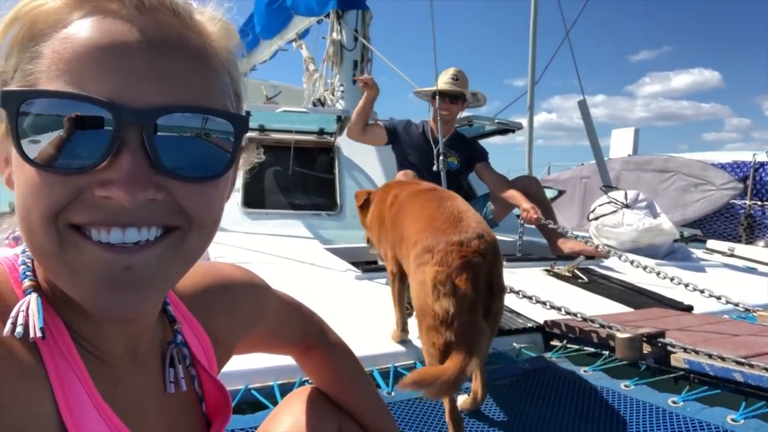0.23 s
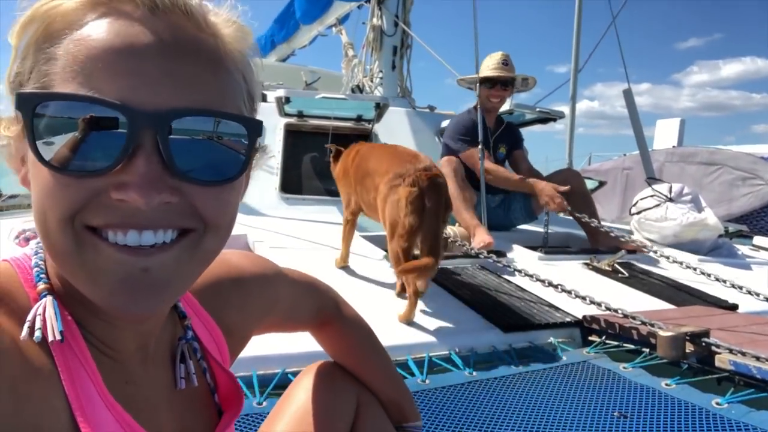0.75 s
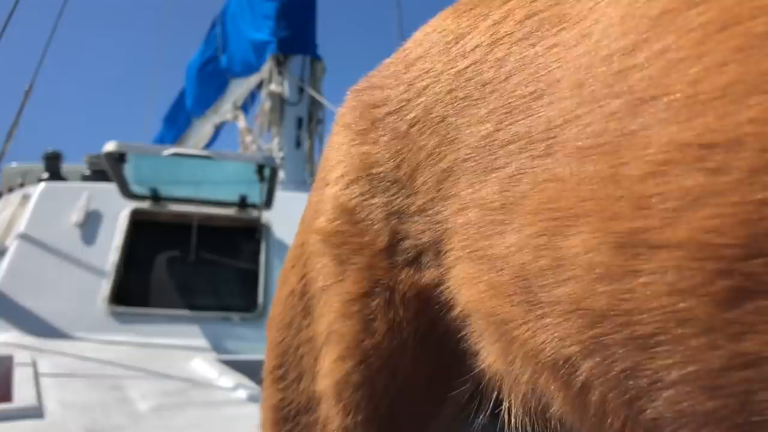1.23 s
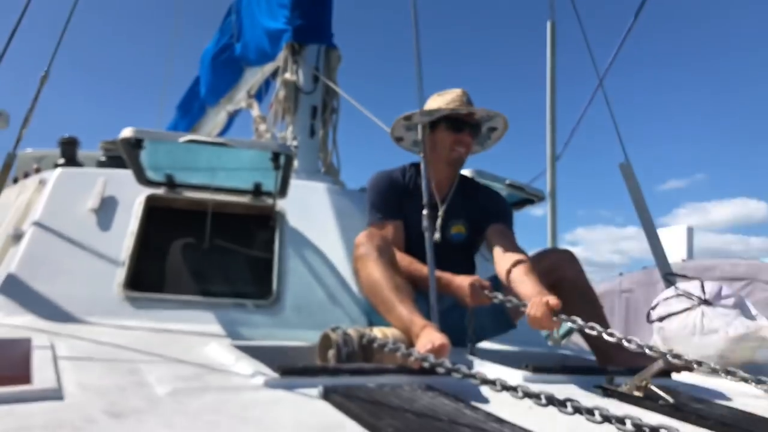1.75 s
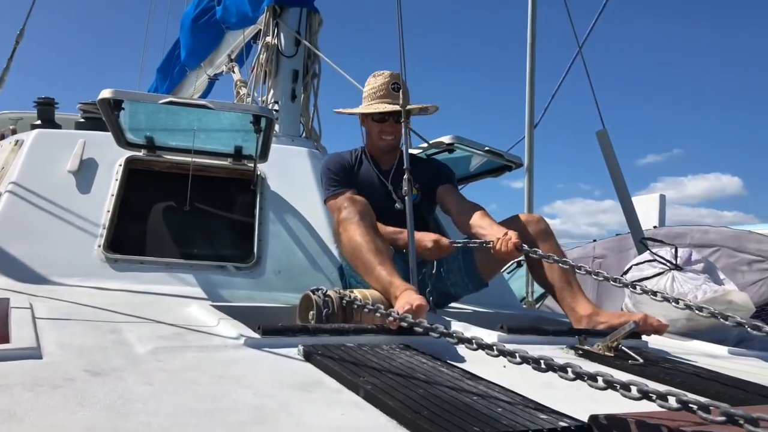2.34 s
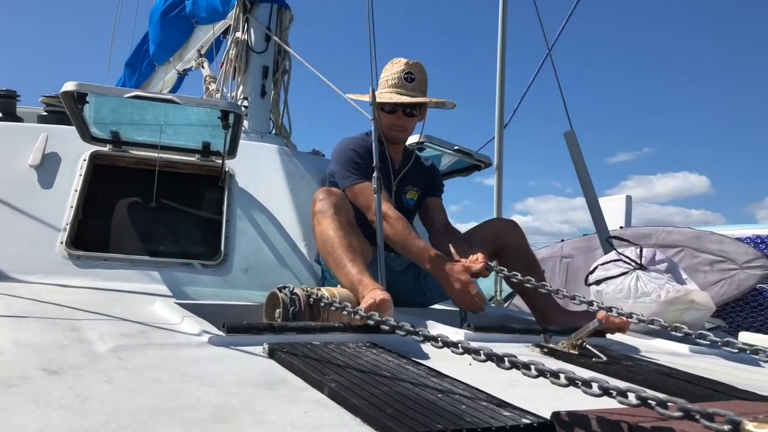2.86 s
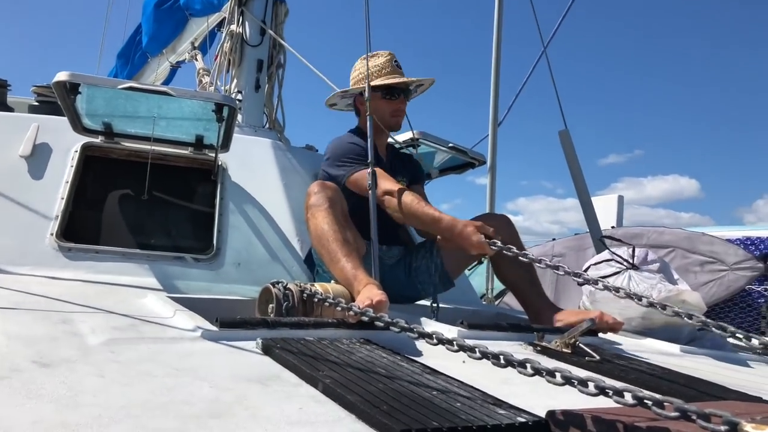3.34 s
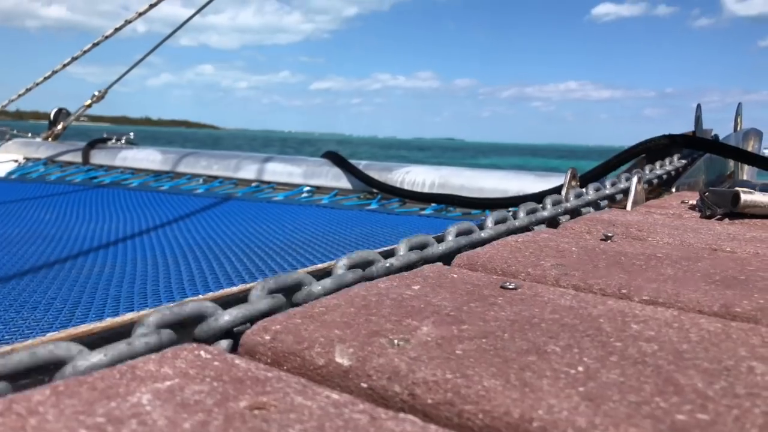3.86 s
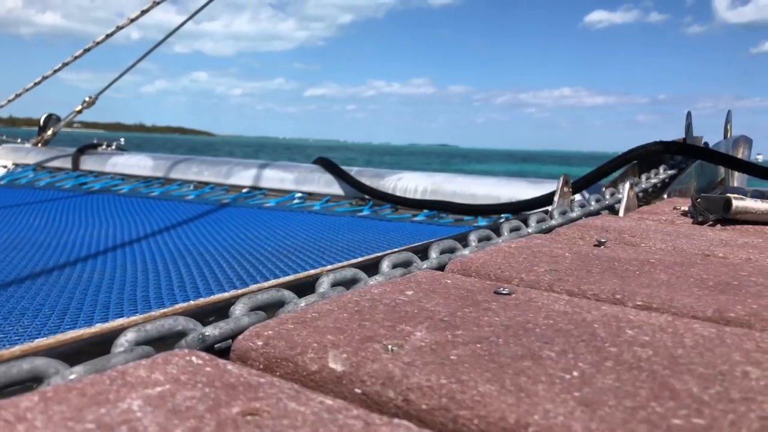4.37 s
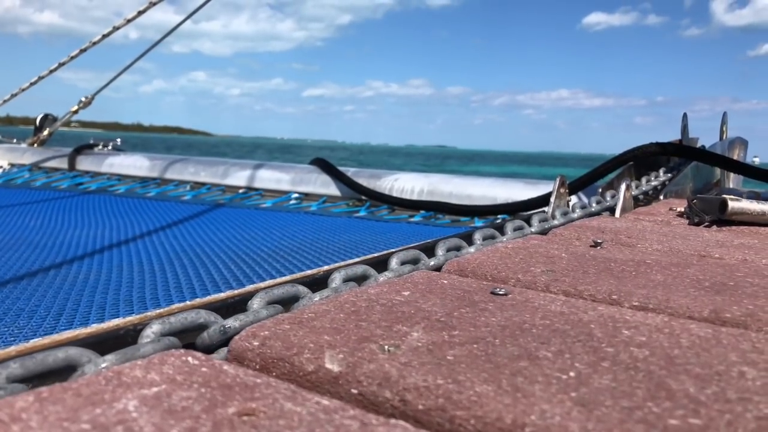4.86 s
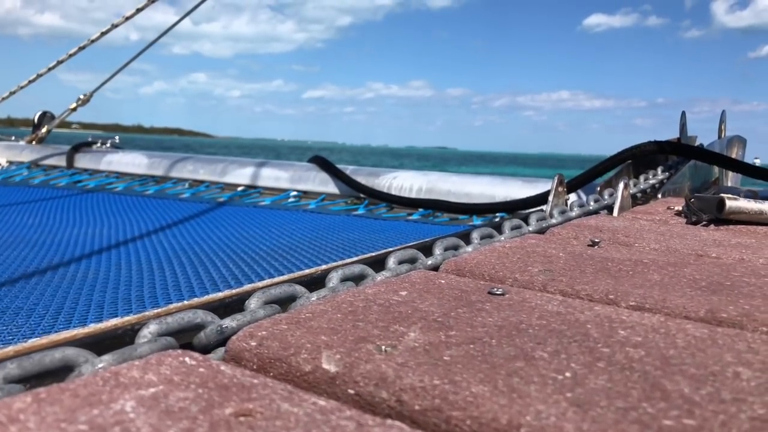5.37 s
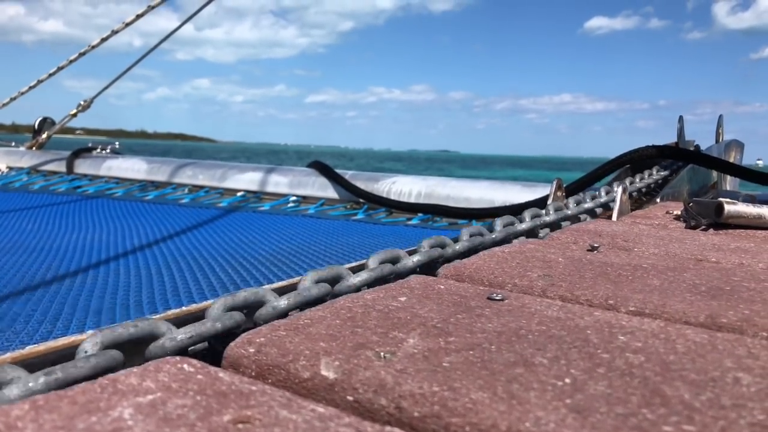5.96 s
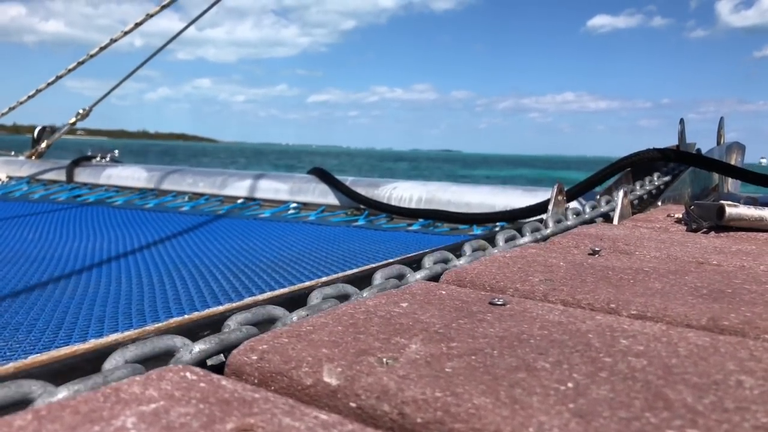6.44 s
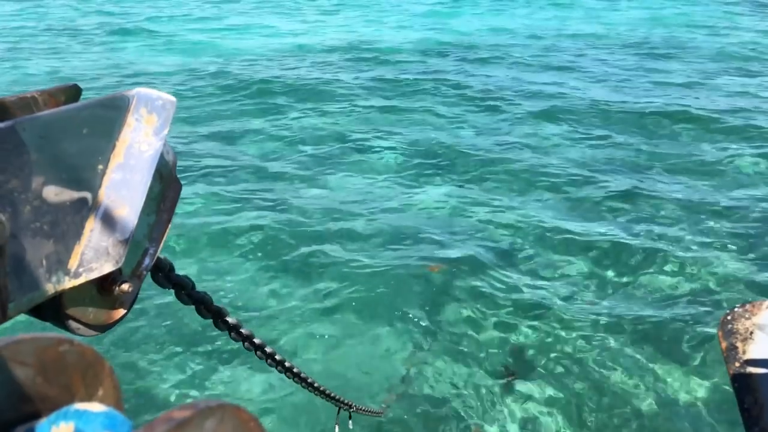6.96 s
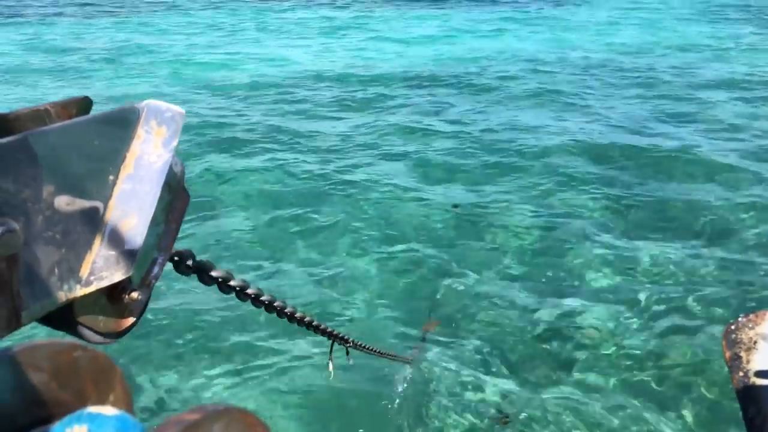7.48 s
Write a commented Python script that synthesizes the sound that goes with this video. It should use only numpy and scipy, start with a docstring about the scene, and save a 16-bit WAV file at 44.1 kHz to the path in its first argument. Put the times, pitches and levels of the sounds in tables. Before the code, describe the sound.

Anchor chain pulled by hand, heard from four successive positions with abrupt changes. Quiet footfalls, scuffs and ticks come first; then small tugs with thin jingling and a short clatter. Next, close loud links hammer wood over gritty dragging, stop, and start again. Last, hard ringing metal over a steel roller with a faint hum. Soft sea and breeze throughout, dry open air, close microphone.

```python
"""An anchor chain is hauled by hand over a boat's foredeck planks, heard from four places in turn.
First paws and feet thud on the hull amid scuffs, ticks and small pulls; from 1.29 s links clink, tap and jingle.
From 3.53 s long pulls grind while links knock hard on the planks; from 6.7 s bright clinks ring a steel roller.
Drag is grit noise, blows are decaying modes and noise bursts; sea and wind (noise bands) and hiss run throughout."""
import sys
import numpy as np
from scipy import signal
from scipy.fft import rfft, irfft
from scipy.io import wavfile

SR = 44100
rng = np.random.default_rng(int(sys.argv[2]) if len(sys.argv) > 2 else 0)


def to_wav(s):
    """Save 16-bit WAV."""
    ch = np.atleast_2d(s).T  # columns
    pcm = np.round(np.clip(ch, -1, 1) * 32767)  # PCM
    wavfile.write(sys.argv[1], SR, pcm.astype(np.int16))


def rack_gain(trim_db):
    """Turn a fader trim in dB into the linear factor to multiply a signal by."""
    fader = np.asarray(trim_db, float)
    return 10 ** (fader / 20)


N = 340011
T = np.arange(N) / SR

# pulls on the chain: fastest_s, speed_up_s, slow_down_s, grind_db, rasp_db
PULLS = [(.69, 0.081, 0.22, -54, -57.5), (1.33, 0.23, 0.22, -43, -55.5), (2.36, 0.41, 0.38, -40, -44),
         (3.452, 0.16, 0.2, -42.5, -46), (3.8, 0.52, 0.61, -29, -33.5), (4.77, 0.093, 0.18, -44, -88),
         (5.05, 1, 0.33, -64.5, -70.5), (5.978, 0.48, 0.56, -26.5, -32), (7.383, 0.29, 0.55, -35, -32)]
# links dropping on wood: start_s, level_db, pitch_hz
KNOCKS = [(1.386, -23.5, 703), (2.306, -7.5, 1490), (2.31, -11, 1050), (2.446, -33, 921), (2.524, -21, 915),
          (2.567, -18, 880), (2.597, -13.5, 900), (2.642, -25.5, 1160), (3.546, -17.5, 2340),
          (3.57, -18, 1020), (3.59, -10.5, 1250), (3.667, -4.5, 1890), (3.762, -4.5, 1610), (3.82, -9, 867),
          (3.837, 2, 1500), (3.842, -17.5, 783), (3.907, -3, 1666), (3.922, -10, 1330), (4.006, 1, 1710),
          (4.081, -13.5, 1080), (4.103, 0.5, 1680), (4.196, -2.5, 1380), (4.121, -16, 1080),
          (4.215, -15.5, 1390), (4.286, -16.5, 2340), (4.387, -3.5, 1340), (4.444, -17.5, 1970),
          (4.584, -28.5, 990), (4.691, -33, 1170), (4.955, -18.5, 1360), (5.078, -40, 1400),
          (5.159, -38, 1375), (5.24, -32.5, 1470), (5.629, -23, 824), (5.65, -12, 1620),
          (5.726, -11.5, 1220), (5.757, -2, 1310), (5.86, -20, 1510), (5.861, -3, 1750), (5.932, 1, 1630),
          (5.999, 0.5, 1600), (6.018, -0.5, 1610), (6.082, -7.5, 980), (6.094, -3, 1480), (6.14, -16, 732),
          (6.181, 1.5, 2010), (6.23, -20.5, 800), (6.26, -0.5, 1580), (6.274, -14.5, 1500),
          (6.3781, -2.5, 1360), (6.386, 0.5, 1600), (6.577, -21.5, 1020), (6.639, -6.5, 1394),
          (7.223, -37, 2440), (7.251, -25, 885), (7.35, -12, 1970), (7.633, -21.5, 657)]
# links striking steel: start_s, level_db, brightness_db
CLINKS = [(0.706, -34, -13), (1.2188, -25, -8), (1.3028, -29, -29), (2.044, -33, -42), (2.159, -30, -15),
          (2.243, -20, -17), (2.312, -21.5, -8.5), (2.373, -19.5, -17), (2.4346, -36, -26),
          (2.445, -20.5, -17), (2.537, -24, -14), (3.3968, -26, -21), (3.473, -24, -34.5),
          (3.5658, -8, -10), (3.595, -12.5, -40.5), (3.654, -6.5, -7), (3.7317, -6.5, -16.5),
          (3.7536, -14.5, -31), (3.8049, -8, -22), (3.813, -5.5, -15), (3.8965, -5.5, -10.5),
          (3.9904, -10, -10), (4.0809, -5.5, -24.5), (5.557, -41, -36), (5.598, -33, -17),
          (5.6409, -19, -16), (5.739, -15.5, -20), (5.7529, -9, -10.5), (5.834, -19.5, -11),
          (5.913, -8.5, -12), (5.9923, -10, -9.5), (6.0708, -12.5, -17.5), (6.1564, -5, -12),
          (6.182, -17.5, -44.5), (6.259, -24.5, -20), (6.32, -21.5, -20), (6.414, -16.5, -32),
          (6.639, -15.5, -30), (7.1595, -12, -13), (7.2782, -6.5, -12), (7.355, -2, -1.5),
          (7.363, -18.5, -37), (7.424, -13, -14.5), (7.44, -7.5, -3), (7.5194, -3, -8.5),
          (7.5903, -20.5, -42.5), (7.6038, -7, -5), (7.652, -15.5, -16), (7.6985, -7.5, -13.5)]
# paws, feet and chain on the hollow hull: start_s, level_db, pitch_hz
THUDS = [(0.087, -30, 144), (0.275, -36, 150), (0.294, -35, 382), (0.361, -41, 196), (0.426, -32, 327),
         (0.53, -37, 410), (0.569, -33.5, 584), (0.94, -42, 286), (3.773, -21, 150), (0.303, -31, 119),
         (0.435, -26.5, 454), (0.451, -32, 245), (0.564, -35, 250), (0.653, -38.5, 284),
         (1.386, -20.5, 272), (2.522, -26.5, 338), (2.595, -22, 276), (4.373, -41, 310)]
# scuffs and short ticks on the deck: start_s, level_db, brightness_db, length_s (held to 0.004 or more)
SCUFFS = [(.0, -40.5, -5, 0.031), (0.056, -42, 5, .04), (0.147, -39.5, -2.5, 0.052),
          (0.333, -40, -8, 0.088), (0.449, -42, -3, 0.01), (0.554, -48, -22, 0.021),
          (0.61, -34, -10, 0.086), (0.863, -36, -18, 0.049), (0.918, -40.5, -4, 0.02),
          (0.99, -49, 0, 0.0071), (1.153, -42.5, -8, 0.008), (1.035, -39, -14, 0.0094),
          (2.131, -31, 1, 0.0063), (1.072, -41, -16, 0.063), (1.489, -39.5, -34, 0.063),
          (1.584, -32.5, 2, 0.014), (1.607, -34, -13, 0.011), (1.623, -35.5, 1, 0.017),
          (4.34, -36, -11, 0.0036), (1.301, -39, -24, 0.069), (1.963, -38.5, -13, 0.071),
          (2.71, -43.5, 4, 0.031), (2.976, -40, 7, 0.0031), (3.03, -37, -4, 0.0035),
          (3.04, -41.5, -8, 0.019), (3.059, -35, -4, 0.017), (4.376, -29, -35, 0.0034),
          (4.966, -46.5, 4, 0.042), (5.232, -50, 1, 0.013), (6.751, -45, -22, 0.062),
          (6.929, -40.5, -8, 0.049)]
# link dragging a little, deck singing: start_s, level_db, pitch_hz, length_s
SCRAPES = [(1.485, -39, 2160, 0.045), (3.236, -46, 1850, 0.056), (4.75, -32.5, 1430, 0.055),
           (4.872, -39, 1300, 0.07), (5.23, -39.5, 1520, 0.035)]
# slack links tapping each other: start_s, level_db
JINGLE = [(1.3633, -30), (1.41, -32), (1.483, -40), (1.604, -32), (1.6797, -32.5), (2.096, -34.5),
          (2.533, -39), (2.594, -31), (2.613, -43), (2.631, -28.5), (4.7385, -48), (4.8267, -46),
          (4.889, -49), (4.9566, -53), (5.2365, -58)]
# pile settling, faint taps at random: from_s, to_s, taps (rounded down), level_db
SETTLING = [(2.11, 2.705, 9, -46), (4.76, 5.316, 6.6, -46.5)]

# plank modes under a link: pitch_hz, longest_t60_s
PLANK_MODES = [(740, 0.024), (920, 0.023), (1150, 0.02), (1400, 0.015), (1760, 0.02), (2250, 0.018),
               (3260, 0.036), (4300, 0.015)]
# steel bow roller modes: pitch_hz, width_hz, level_db
ROLLER_MODES = [(690, 66, -5), (915, 61, -1.5), (1020, 58, -4.5), (1970, 41, 2), (2190, 230, -5.5),
                (2740, 59, -8), (3480, 59, 4.5), (3590, 100, 6.5), (4080, 94, -15.5), (4190, 120, -12),
                (5830, 110, -16.5)]
# hollow hull modes: pitch_hz, width_hz, level_db
HULL_MODES = [(71, 26, -11), (130, 67, 0.5), (226, 24, -2), (310, 99, -8)]
# hum tones: pitch_hz, width_hz, level_db
HUM_MODES = [(194, 14, 0), (368, 63, -2.5), (429, 2.3, 7), (525, 4.3, -1)]
# bending rings of a loaded link: pitch_hz
LINK_BEND_HZ = [3280, 4054, 4496, 5107, 6366, 6930, 7360, 8320, 9950, 11330]
# lengthwise rings of a free link: pitch_hz
LINK_LENGTH_HZ = [15540, 15640, 15740]

# coarse drag spectrum: pitch_hz, level_db (per Hz)
GRIND_SPECTRUM = [(180, -48), (300, -6.5), (420, -6.5), (530, 2), (1040, -3), (1730, -2), (3000, -16),
                  (3900, -18.5), (6600, -120)]
# fine drag spectrum: pitch_hz, level_db (per Hz)
RASP_SPECTRUM = [(1800, -4.5), (3000, 2.5), (5000, -1.5), (8000, -11), (11000, -56.5)]
# top treble of the drag: pitch_hz, level_db (per Hz)
FIZZ_SPECTRUM = [(6000, -48.5), (9000, 10), (14000, -2.5), (15700, -4), (16000, -53)]
# noise of a link on wood: pitch_hz, level_db (per Hz)
CRACK_SPECTRUM = [(500, -2.5), (1500, -0.5), (4500, -7), (8000, -37.5), (16000, -57)]
# clink on steel: pitch_hz, level_db (per Hz)
STEEL_SPECTRUM = [(1400, -8.5), (2600, -1), (3500, -3.5), (6000, -1.5), (9000, 4), (15600, -17),
                  (16000, -35)]
# scuffs, deck ticks and jingle ticks: pitch_hz, level_db (per Hz)
SCUFF_SPECTRUM = [(500, 2.5), (1500, 4), (4000, 1), (6000, -1.5), (15600, -9.5), (16000, -41)]
# sea and wind: pitch_hz, level_db (per Hz)
WASH_SPECTRUM = [(20, -20.5), (40, -5.5), (65, 2), (130, -4), (220, 0.5), (400, -8.5), (700, -21.5),
                 (2000, -44), (6000, -45), (15500, -102), (16000, -68.5)]
# microphone hiss: pitch_hz, level_db (per Hz)
HISS_SPECTRUM = [(1000, 2), (15600, -21), (16000, -33.5)]

# four listening places in turn: from_s
PLACE_FROM_S = [0, 1.29, 3.53, 6.698]
# chain stirring between pulls, coarse part: level_db at each place
CREEP_GRIND_DB = [-57.5, -60, -59.5, -66]
# chain stirring between pulls, fine part: level_db at each place
CREEP_RASP_DB = [-63, -65, -77, -65]
# drag gain between jerks: gain_db at each place
GAP_DB = [0.5, -4, -8, 1]
# hull boom re grind: gain_db at each place
BOOM_DB = [2.5, -4, -6, -20.5]
# steel roller: gain_db at each place
ROLLER_DB = [-18, -69, -46.5, 3.5]
# fizz re rasp: gain_db at each place
FIZZ_DB = [-18.5, -15.5, -17, -12.5]
# link tones in a clink: gain_db at each place
LINK_RING_DB = [-24, -15, -23, -22]
# sea: level_db at each place
SEA_DB = [-47, -45, -48, -50]
# wind: level_db at each place
WIND_DB = [-45, -46, -45.5, -46.5]
# hum: level_db at each place
HUM_DB = [-82, -99, -56, -47.5]
# added treble of the near sounds: gain_db at each place
TOP_DB = [-1, -2.5, 1, -2]
PLACE = np.searchsorted(PLACE_FROM_S, T, side="right") - 1


def level(x, db):
    """Scale to an rms level."""
    return x * rack_gain(db) / np.sqrt(np.mean(x ** 2))


def colour(x, points, tilt_db=0.):
    """Filter through (Hz, dB) points; the tilt ramps in over the octave above 4340 Hz."""
    hz, db = np.transpose(points)
    f = np.maximum(np.arange(len(x) // 2 + 1) * SR / len(x), 1)
    lift_db = tilt_db * np.clip(np.log2(f / 4340.0), 0, 1)
    gain_db = np.interp(np.log(f), np.log(hz), db) + lift_db
    return irfft(rfft(x) * rack_gain(gain_db), len(x))


def ring(x, modes):
    """Sum of two-pole resonances (Hz, width Hz, dB), neighbours in opposite phase."""
    out = 0
    for k, (hz, width_hz, db) in enumerate(modes):
        b, a = signal.iirpeak(hz, hz / width_hz, SR)
        out = out + (-1) ** k * rack_gain(db) * signal.lfilter(b, a, x)
    return out


def decay(t, t60_s):
    """Exponential fall, 60 dB in t60_s."""
    return np.exp(-np.log(1000) * t / t60_s)


def walk(rate_hz):
    """Slow random wander of unit spread, up to 40 knots a second."""
    knots = rng.standard_normal(int(N / SR * 40) + 2)
    x = np.interp(T * min(rate_hz, 40), np.arange(len(knots)), knots)
    return x / x.std()


def add(out, start_s, sound, db):
    """Lay in a short sound at a given peak, its last quarter faded out."""
    i = max(int(start_s * SR), 0)
    sound = sound * np.clip(np.linspace(4, 0, len(sound)), 0, 1)
    out[i:i + len(sound)] += (sound * rack_gain(db) / np.abs(sound).max())[:N - i]


def at_place(db):
    """Gain over time from one level per listening place."""
    return rack_gain(np.array(db, float))[PLACE]


def grit(rate_hz, spread_db, t60_s, steady):
    """Noise lit by tiny scrapes at random moments, a few larger than the rest, over a steady rub."""
    chance = rng.random((2, N))
    impacts = (chance[0] < rate_hz / SR) * rack_gain(-spread_db * np.log(1.02 - chance[1]))
    pole = [1, -decay(1 / SR, t60_s)]
    swell = signal.lfilter([1], np.convolve(pole, pole), impacts)
    return (swell / swell.mean() + steady) * rng.standard_normal(N)


def pulls():
    """Grind and rasp gains: humps over an idle creep; each landing link jerks the chain, then the drag sinks."""
    grind_fade_db, rasp_fade_db, hump_power, jerk_t60_s = 27.5, 43.5, 2.62, 0.17
    stir = rack_gain(3.0 * walk(8))
    grind, rasp = stir * at_place(CREEP_GRIND_DB), stir * at_place(CREEP_RASP_DB)
    landings = np.zeros(N)
    landings[(np.array(KNOCKS + CLINKS)[:, 0] * SR).astype(int)] = 1
    surge = signal.lfilter([1], [1, -decay(1 / SR, jerk_t60_s)], landings)
    jerk = at_place(GAP_DB) + np.minimum(surge, 1)
    for fastest_s, rise_s, fall_s, grind_db, rasp_db in PULLS:
        away = np.abs(T - fastest_s) / np.where(T < fastest_s, rise_s, fall_s)
        slack = np.clip(away, 0, 4) ** hump_power
        # heard from its own place only
        here = jerk * (PLACE == PLACE[int(fastest_s * SR)])
        grind = grind + here * rack_gain(grind_db - grind_fade_db * slack)
        rasp = rasp + here * rack_gain(rasp_db - rasp_fade_db * slack)
    return grind, rasp


def drag(grind, rasp, coarse):
    """Coarse grit grinds on the deck; fine grit rasps, fizzes and sets the links ringing."""
    fine = grit(350, 1.6, .008, .8)
    rasp_noise = colour(fine, RASP_SPECTRUM)
    chatter = level(ring(rasp_noise, [(hz, 50., 0) for hz in LINK_BEND_HZ]), -11.5)
    fizz = at_place(FIZZ_DB) * level(colour(fine, FIZZ_SPECTRUM), 0)
    return grind * coarse + rasp * (level(rasp_noise, 0) + chatter + fizz)


def knocks():
    """A link rings the plank modes near its pitch; a crack leads, a rattle trails, high landings ring shorter."""
    full_ring_hz, shortening = 980, 0.73
    out, t = np.zeros(N), T[:3072]
    hz, t60_s = np.transpose(PLANK_MODES)[:, :, None]
    for start_s, db, pitch_hz in KNOCKS:
        share = min(1, full_ring_hz / pitch_hz) ** shortening
        chance = rng.standard_normal((len(PLANK_MODES), 1))
        noise = rng.standard_normal(len(t))
        # contact force builds for about two cycles; higher landings crack harder
        contact_s, hard = 1.8 / pitch_hz, (pitch_hz / 1400) ** 2
        push = 1 - np.exp(-(t / contact_s) ** 2)
        gain = rack_gain(-25 * np.abs(np.log2(hz / pitch_hz)) + 2.0 * chance)
        spot_hz = hz * (1 + .03 * chance)
        # modes swing together as the force peaks, then drift apart
        swing = np.cos(2 * np.pi * spot_hz * (t - 1.3 * contact_s))
        body = push * (gain * swing * decay(t, t60_s * share)).sum(axis=0)
        fall = rack_gain(-10) * hard * decay(t, 0.014) + rack_gain(-31) * decay(t, 0.17)
        rattle = level(colour(noise, CRACK_SPECTRUM), 0) * fall
        add(out, start_s + 0.00023, body / np.abs(body).max() + push * rattle, db)
    return out


def clinks():
    """Steel on steel: countless close modes die like a noise burst; link modes ring on, shared out anew each time."""
    out, t = np.zeros(N), T[:4096]
    hz = np.array(LINK_BEND_HZ)[:, None]
    link = at_place(LINK_RING_DB)
    for start_s, db, bright_db in CLINKS:
        chance = rng.standard_normal((2, len(LINK_BEND_HZ), 1))
        noise = rng.standard_normal(len(t))
        swing = np.sin(2 * np.pi * hz * (1 + 0.0073 * chance[1]) * t)
        tones = rack_gain(4.5 * chance[0]) * swing * (decay(t, 0.025) + .3 * decay(t, .08))
        crash = noise * (decay(t, .005) + .4 * decay(t, .026) + rack_gain(-23) * decay(t, .12))
        burst = crash + link[int(start_s * SR)] * tones.sum(axis=0)
        edge = 1 - np.exp(-t / .0005)
        add(out, start_s - .0005, colour(burst, STEEL_SPECTRUM, bright_db) * edge, db)
    return out


def roller(grind, coarse, blows):
    """The steel bow roller resonates to the grind and to every knock and clink."""
    return grind * level(ring(coarse, ROLLER_MODES), 0) + rack_gain(5.0) * ring(blows, ROLLER_MODES)


def hull(grind):
    """Sparse, slow grit booms in the hull modes, following the grind."""
    return grind * level(ring(grit(120, 1.5, .08, .3), HULL_MODES), 0)


def thuds():
    """Soft blows: a slow push rings the hollow hull for a few cycles."""
    out, t = np.zeros(N), T[:4096]
    for start_s, db, hz in THUDS:
        tone = np.sin(2 * np.pi * hz * t)
        tone += 0.36 * np.sin(2 * np.pi * 1.62 * hz * t)
        tone += 0.17 * np.sin(2 * np.pi * 0.62 * hz * t)
        add(out, start_s, tone * decay(t, 9.1 / hz) * (1 - np.exp(-t / 0.0063)), db)
    return out


def scuffs():
    """A noise burst that starts fast, holds and fades: a tick if short, a scuff if longer."""
    out, t = np.zeros(N), T[:8192]
    for start_s, db, bright_db, length_s in SCUFFS:
        shape = (1 - np.exp(-t / 0.00021)) * np.exp(-(t / max(length_s, .004)) ** 3)
        add(out, start_s, colour(rng.standard_normal(len(t)), SCUFF_SPECTRUM, bright_db) * shape, db)
    return out


def scrapes():
    """Short rubbing noise sings through one deck resonance."""
    out, t = np.zeros(N), T[:8192]
    for start_s, db, hz, length_s in SCRAPES:
        shape = (1 - np.exp(-t / 0.0021)) * np.exp(-(t / length_s) ** 3)
        add(out, start_s, ring(rng.standard_normal(len(t)), [(hz, hz / 7, 0)]) * shape, db)
    return out


def jingle():
    """Slack links: a thin tick, then three close tones beating at the top of hearing."""
    out, t = np.zeros(N), T[:8192]
    centre_hz = np.array(LINK_LENGTH_HZ)[:, None]
    faint = [(s, db) for from_s, to_s, taps, db in SETTLING for s in rng.uniform(from_s, to_s, int(taps))]
    for start_s, db in JINGLE + faint:
        chance = rng.standard_normal((2, len(LINK_LENGTH_HZ), 1))
        noise = rng.standard_normal(len(t))
        tones = rack_gain(4.7 * chance[0]) * np.sin(2 * np.pi * (centre_hz + 30 * chance[1]) * t)
        tick = noise * (decay(t, 0.005) + 0.19 * decay(t, 0.11))
        tick = rack_gain(5.5) * colour(tick, SCUFF_SPECTRUM, 2.74)
        edge = 1 - np.exp(-t / .008)
        add(out, start_s, tones.sum(axis=0) * decay(t, 0.096) * edge + tick, db)
    return out


def wash(octaves):
    """Water at the hull or wind: octave bands of noise that swell together and flicker alone."""
    out, swell = 0, walk(0.87)
    for hz in 30 * 2 ** octaves:
        band = [(hz / 2, -40), (hz / 1.3, -3), (hz, 0), (hz * 1.3, -3), (hz * 2, -40)]
        out = out + colour(rng.standard_normal(N), band) * rack_gain(1.6 * swell + 2.0 * walk(7))
    return level(colour(out, WASH_SPECTRUM), 0)


def hum():
    """Noise through narrow resonances: a soft hum of a few wavering tones."""
    return level(ring(rng.standard_normal(N), HUM_MODES), 0)


def scene():
    """Near chain and deck sounds over far sea, wind and hum; the level dips briefly at each change of place."""
    top_hz, dip_s = 11900, 0.0031
    grind, rasp = pulls()
    coarse = level(colour(grit(300, 1.3, .012, .9), GRIND_SPECTRUM), 0)
    blows = clinks() + knocks()
    near = drag(grind, rasp, coarse) + blows
    near = near + at_place(ROLLER_DB) * roller(grind, coarse, blows) + at_place(BOOM_DB) * hull(grind)
    near = near + thuds() + scuffs() + scrapes() + jingle()
    sea = at_place(SEA_DB) * wash(np.arange(3, 10))
    wind = at_place(WIND_DB) * wash(np.arange(3))
    far = sea + wind + at_place(HUM_DB) * hum()
    top = signal.sosfilt(signal.butter(2, top_hz, "high", fs=SR, output="sos"), near)
    dips = np.prod([1 - np.exp(-((T - s) / dip_s) ** 2) for s in PLACE_FROM_S[1:]], axis=0)
    return (dips * (near + at_place(TOP_DB) * top + far))[None]


def roll_off(x):
    """The treble ends steeply here."""
    return signal.sosfilt(signal.butter(12, 16660, fs=SR, output="sos"), x)


def record(dry):
    """Microphone: faint hiss, bass cut, steep treble cut; the loudest blows are rounded off near half scale."""
    dry = dry + level(colour(rng.standard_normal(N), HISS_SPECTRUM), -74)
    dry = signal.sosfilt(signal.butter(2, 36, "high", fs=SR, output="sos"), dry)
    dry = signal.sosfilt(signal.ellip(8, .3, 50, 15850, fs=SR, output="sos"), dry)
    mix = 0.51 * np.tanh(dry / 0.53)
    return roll_off(mix)


dry = scene()
out = record(dry)
to_wav(out)
```